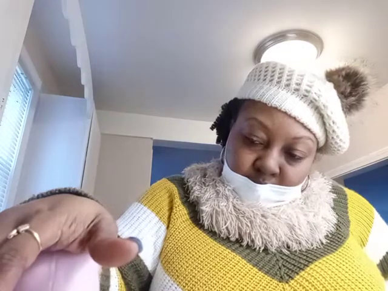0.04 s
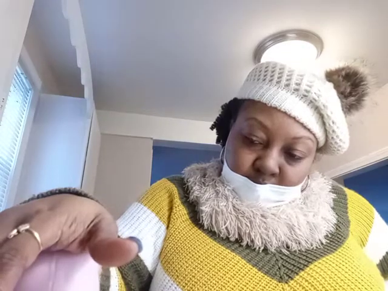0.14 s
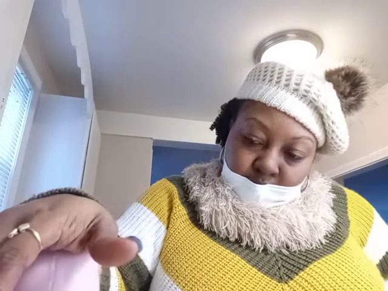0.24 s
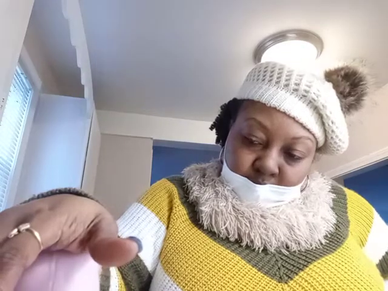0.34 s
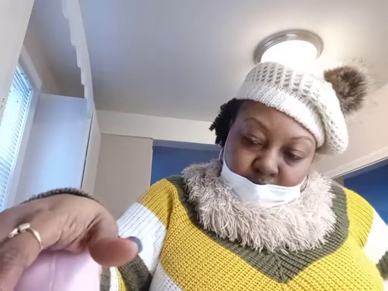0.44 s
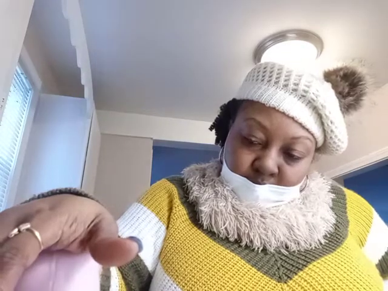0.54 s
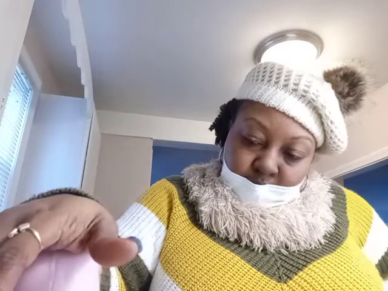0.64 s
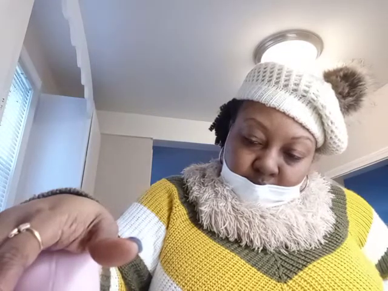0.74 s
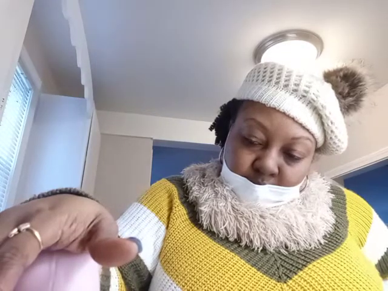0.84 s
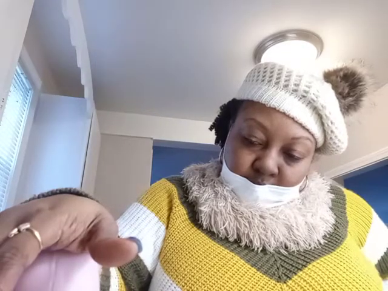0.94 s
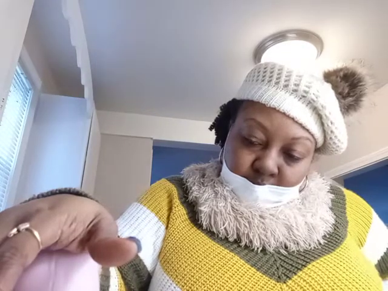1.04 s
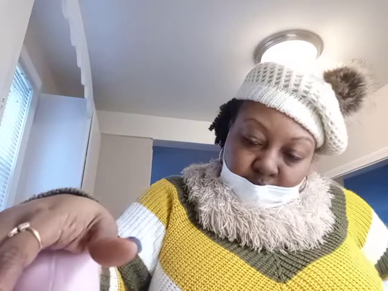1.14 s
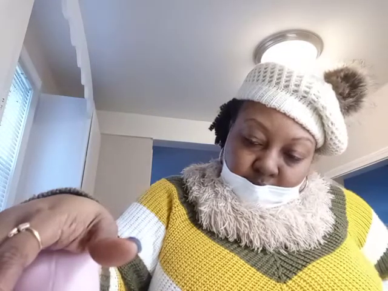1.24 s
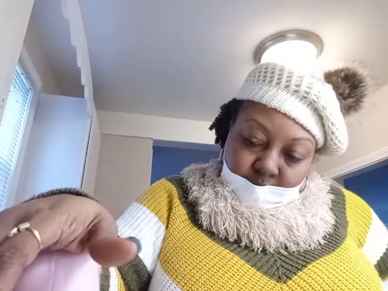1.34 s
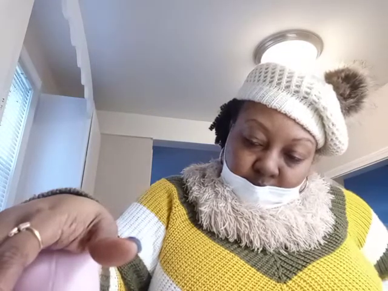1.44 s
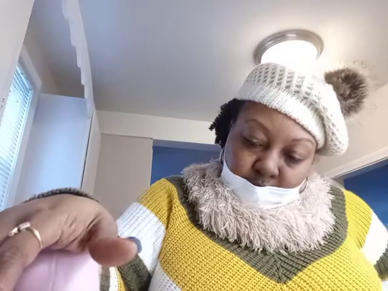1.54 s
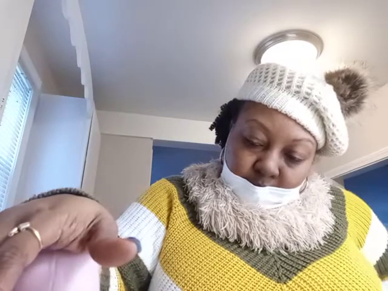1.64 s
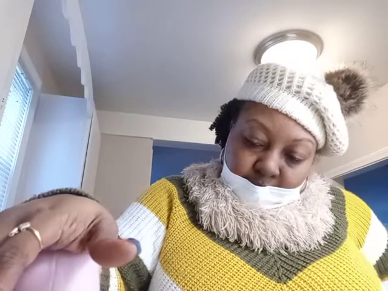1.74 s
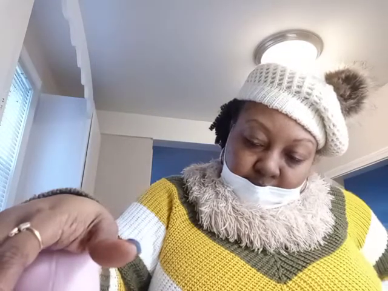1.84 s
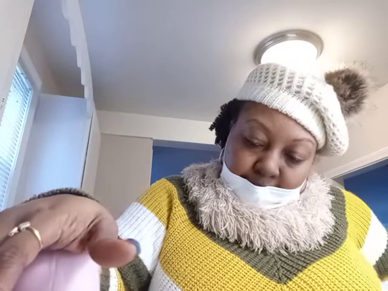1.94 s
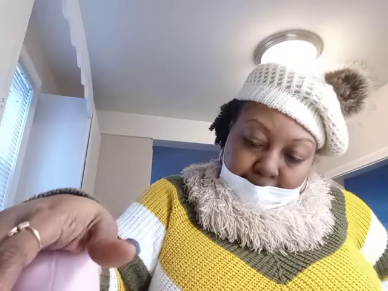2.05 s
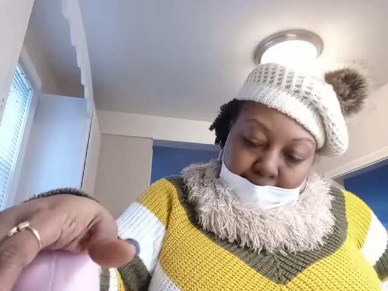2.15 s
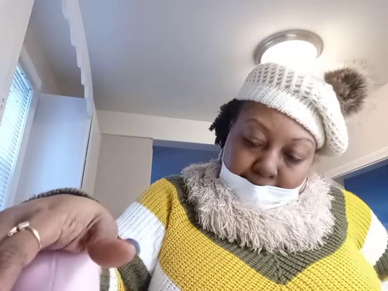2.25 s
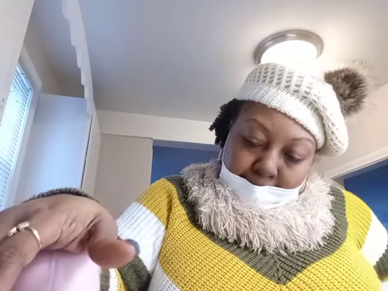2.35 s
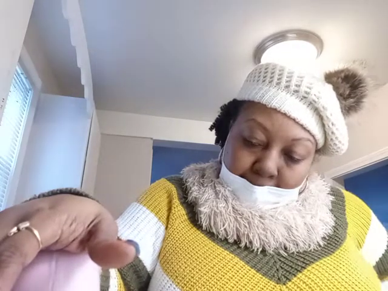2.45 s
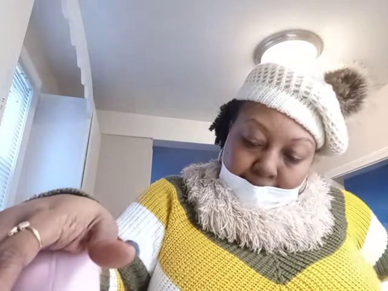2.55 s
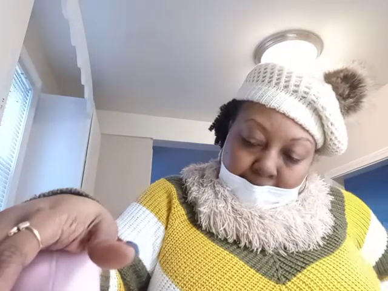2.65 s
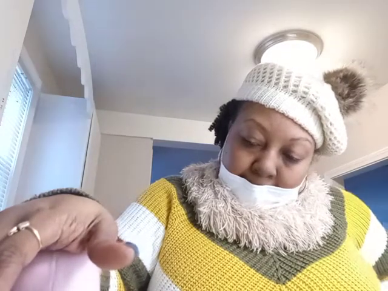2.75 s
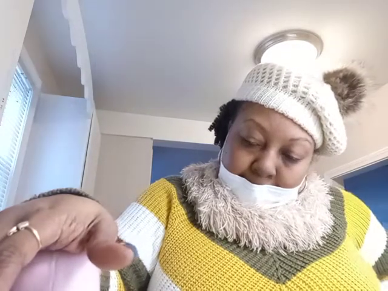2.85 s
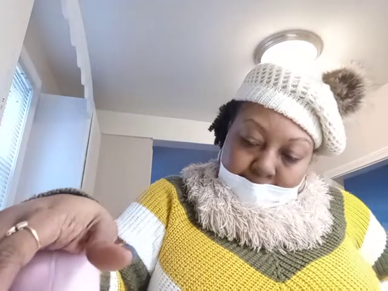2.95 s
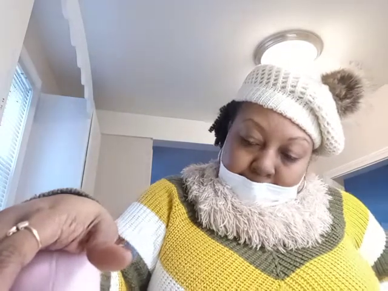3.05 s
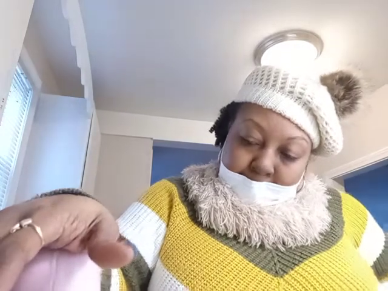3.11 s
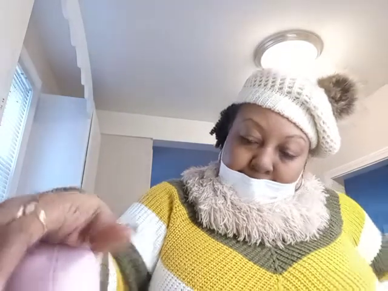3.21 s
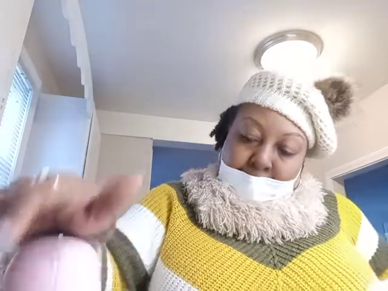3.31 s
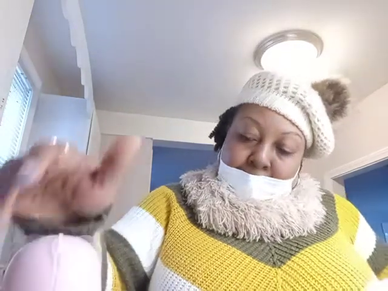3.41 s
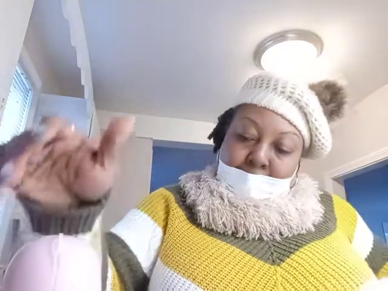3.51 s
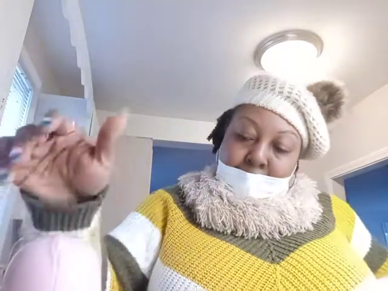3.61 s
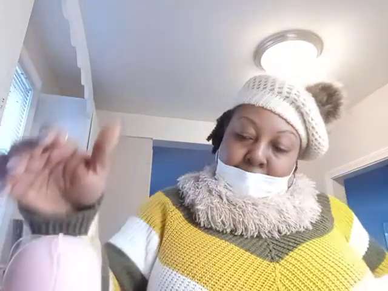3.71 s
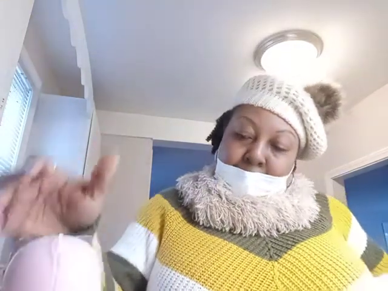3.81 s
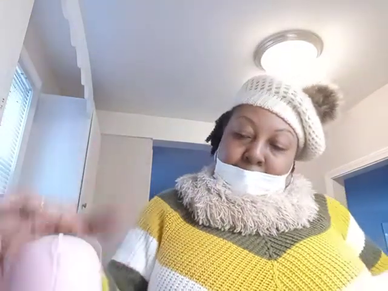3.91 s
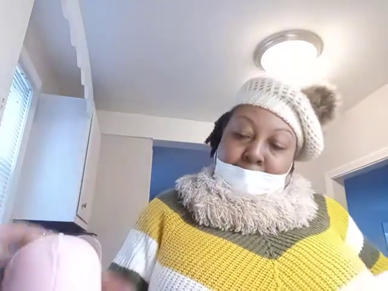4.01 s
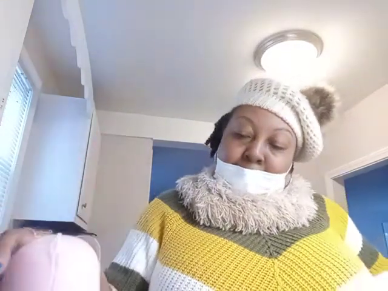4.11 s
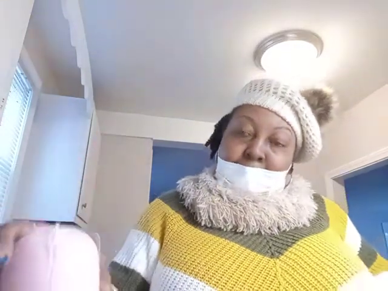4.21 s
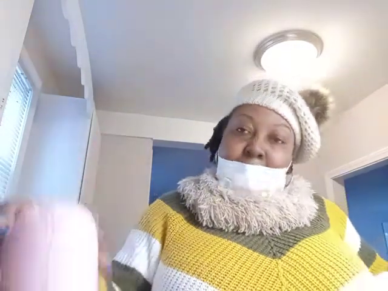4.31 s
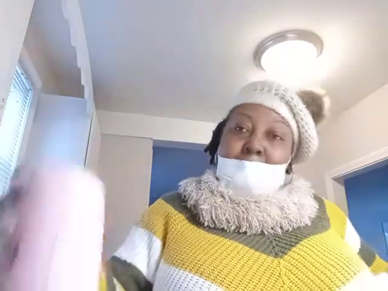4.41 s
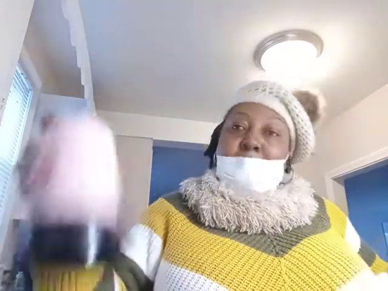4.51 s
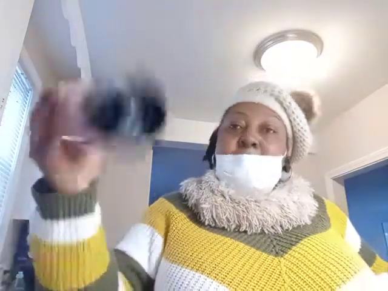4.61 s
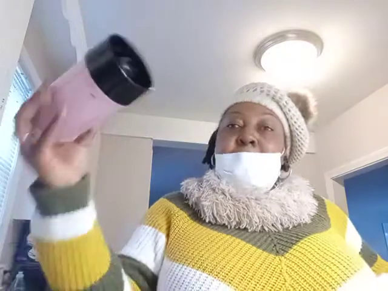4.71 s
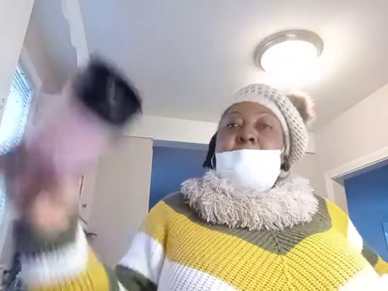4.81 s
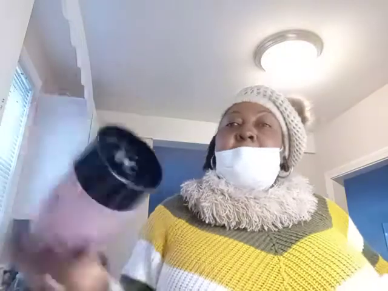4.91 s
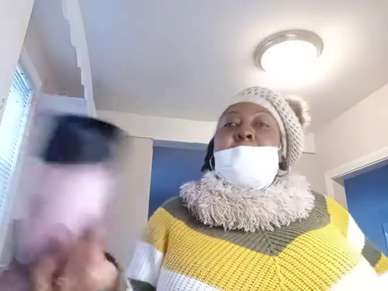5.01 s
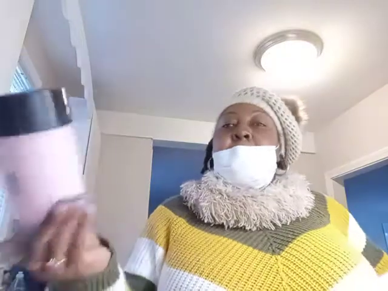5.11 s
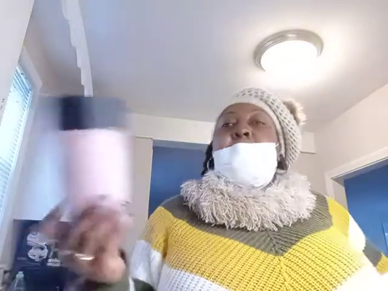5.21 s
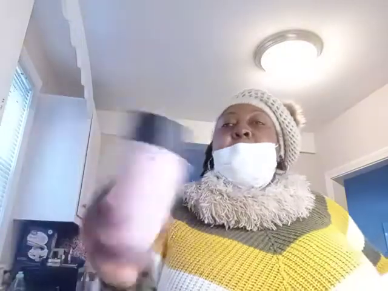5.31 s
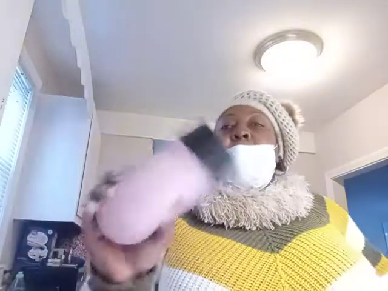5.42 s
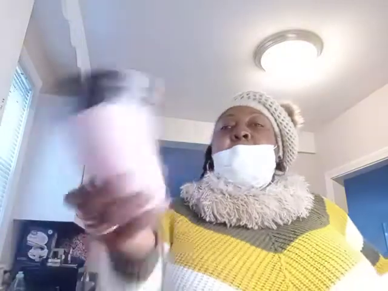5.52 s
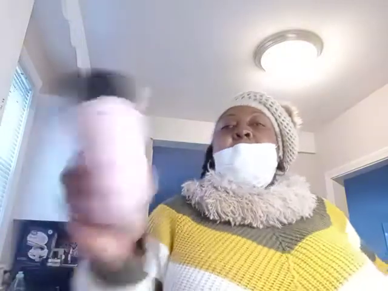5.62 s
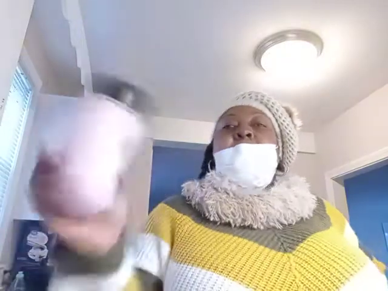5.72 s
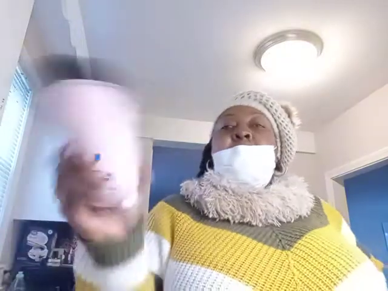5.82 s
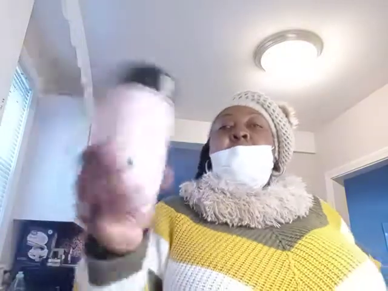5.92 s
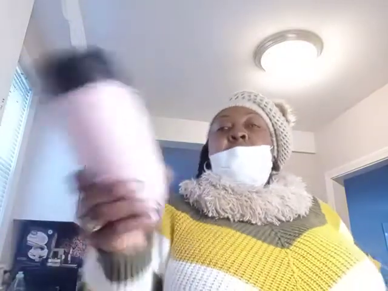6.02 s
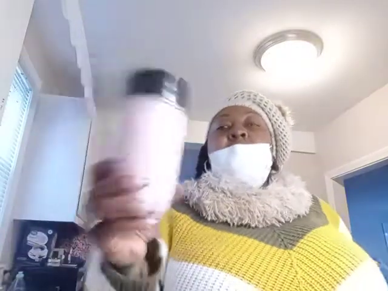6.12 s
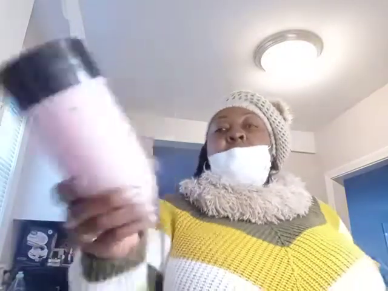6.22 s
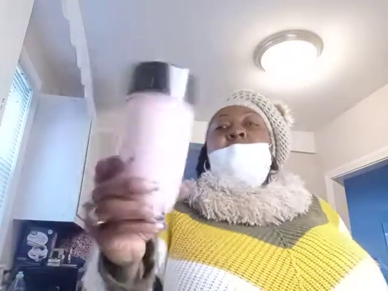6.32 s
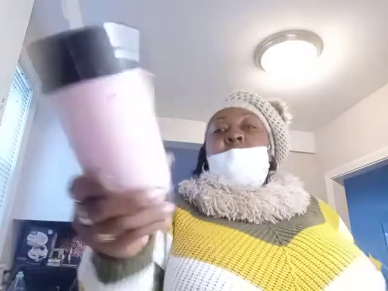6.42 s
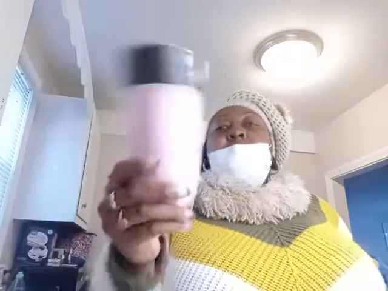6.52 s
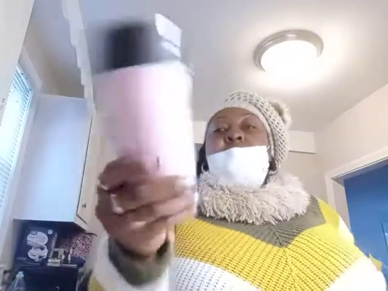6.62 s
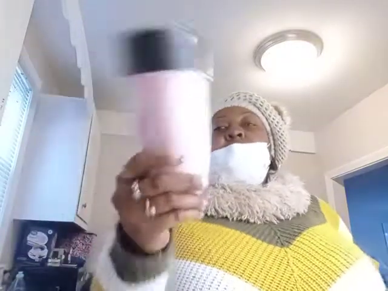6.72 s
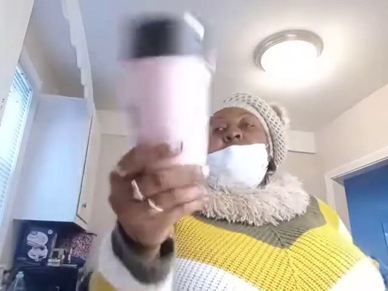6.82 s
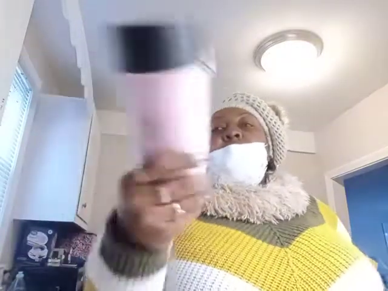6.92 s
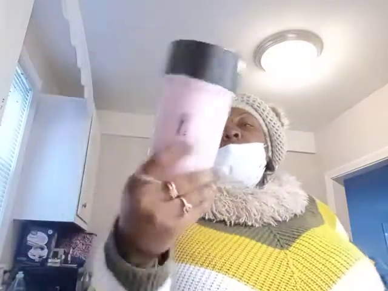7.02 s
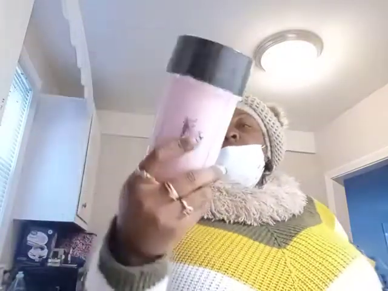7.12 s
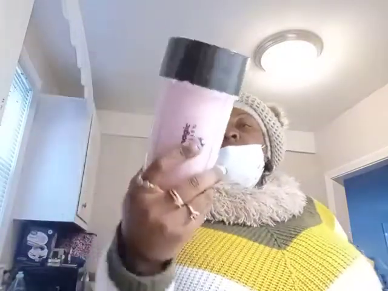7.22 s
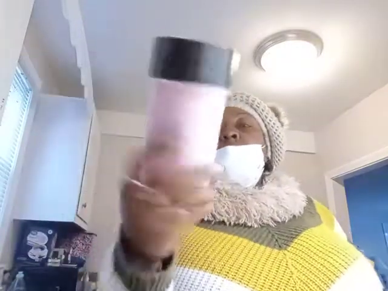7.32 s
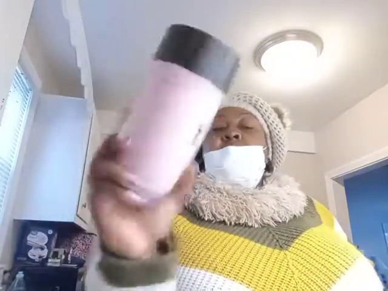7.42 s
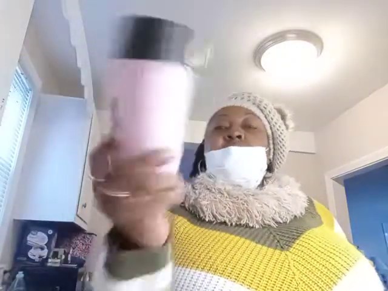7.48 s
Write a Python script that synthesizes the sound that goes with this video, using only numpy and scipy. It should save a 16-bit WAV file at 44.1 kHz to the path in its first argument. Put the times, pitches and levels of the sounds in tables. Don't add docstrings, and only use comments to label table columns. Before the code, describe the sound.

In a small kitchen, with a phone close by on the counter, a compact blender runs loudly and steadily, a harsh buzzing rattle with churning fruit. It cuts off, winds down in a fraction of a second and squeaks faintly. After a brief hush the cup is wrenched off with dull thuds and scrapes, then shaken: ring taps on plastic, thick sloshing and little hollow pops over faint hum and hiss.

```python
import sys
import numpy as np
from scipy import signal
from scipy.fft import rfft, irfft
from scipy.io import wavfile
from scipy.ndimage import uniform_filter1d

SR = 44100
rng = np.random.default_rng(int(sys.argv[2]) if len(sys.argv) > 2 else 0)


def elevation(decibels):
    levels = np.asarray(decibels, float)
    return 10 ** (levels / 20)


def generate_wav(sig):
    pcm = np.round(np.clip(np.atleast_2d(sig).T, -1, 1) * 32767).astype(np.int16)
    wavfile.write(sys.argv[1], SR, pcm)


N = 332955
T = np.arange(N) / SR
HIT_T = np.arange(6000) / SR


def unit(x):
    return x / np.sqrt(np.mean(x ** 2))


def slope(f, points):
    hz, db = np.transpose(points)
    return elevation(np.interp(np.log(f + 1), np.log(hz), db))


def peaks(f, modes):
    return np.sqrt(sum(elevation(db) ** 2 / (1 + (2 * (f - hz) / w) ** 2) ** 2 for hz, w, db in modes))


def edge(f, hz):
    return 1 / (1 + (f / hz) ** 8)


def shape(x, gain, size=8192):
    cep = irfft(np.log(gain(np.fft.rfftfreq(size, 1 / SR)) + 1e-7), size)
    cep[1:size // 2] *= 2
    cep[size // 2 + 1:] = 0
    response = irfft(np.exp(rfft(cep)), size)
    return signal.oaconvolve(x, response)[:len(x)]


def walk(rate_hz):
    k = int(SR / rate_hz)
    held = np.repeat(rng.standard_normal(N // k + 1), k)[:N]
    return unit(uniform_filter1d(uniform_filter1d(held, k), k))


def noise_like(gain, size=8192):
    return unit(shape(rng.standard_normal(N), gain, size))


def add(out, s, sound):
    i = int(s * SR)
    out[i:i + len(sound)] += sound[:N - i]


def ring(t, hz, t60_s):
    return np.sin(2 * np.pi * hz * t) * 1000. ** (-t / t60_s)


def burst():
    return rng.standard_normal(len(HIT_T))


def shaft_turns(running, load, off_s):
    run_hz, stop_hz, slowing_s = 173.96, 62.4, 0.27
    speed_hz = run_hz * (1 - .004 * load + .004 * walk(12))
    coast_hz = stop_hz + (speed_hz - stop_hz) * np.exp(-np.abs(T - off_s) / slowing_s)
    return np.cumsum(np.where(running, speed_hz, coast_hz)) / SR


def blender():
    # (frequency [Hz], level [dB per Hz])
    body = [(24, -63.5), (40, -37), (124, -11.5), (276, -38), (337, -6.5), (529, -10.5), (751, -15),
            (852, -9), (1150, -11.5), (2100, -4.5), (2770, -3.5), (3300, -6.5), (5050, -15.5), (8550, -13),
            (16000, -40)]
    # (frequency [Hz], width [Hz], level [dB])
    body_rings = [(114, 3.2, -9.5), (165, 20, -9.5), (235.3, 39, -14.5), (335, 38, -9.5), (529, 42.4, -1.5),
                  (640.7, 55, -5), (855, 28, -4.5), (1350, 130, -8.5), (1750, 6.9, 1.5), (2060, 210, -4),
                  (2340, 660, -5), (6570, 380, -13), (7030, 220, -4.5), (7170, 150, -15.5), (7600, 140, -8),
                  (8270, 160, -5.5), (9025, 260, -12), (10040, 270, -13), (10600, 520, -18),
                  (13960, 600, -32), (15440, 300, -36)]
    # (frequency [Hz], width [Hz], level [dB])
    wall_rings = [(3014, 110, 0), (3160, 210, -4), (3276, 130, 3.5), (3390, 90, 3.5), (3530, 190, -3),
                  (3690, 94, -4), (3830, 150, 0.5), (3940, 60, -0.5), (4030, 90, -3), (4120, 62, -4),
                  (4200, 60, -5.5), (4260, 90, -13), (4340, 98, -6), (4510, 260, -11.5)]
    # (frequency [Hz], level [dB per Hz])
    coast = [(24, -20), (50, -12), (87, 7.5), (144, -19), (243, -9), (305, -15.5), (630, 1.5), (751, -16.5),
             (873, 0), (1210, -15.5), (2900, -13.5), (3950, -14), (5180, -27.5), (8130, -17.5),
             (11600, -23.5), (16000, -34)]
    # (frequency [Hz], width [Hz], level [dB])
    coast_rings = [(94, 25, -5), (237, 37, -3.5), (503, 30, -6), (870, 40, -3.5), (1300, 41, -12.5),
                   (2350, 86, -11.5), (3705, 140, -6.5), (4200, 180, -11.5), (7000, 440, -18.5),
                   (8120, 410, -18), (10170, 1500, -21)]
    # (shaft multiple [-], rms level [dB])
    orders = [(1, -75), (2, -45), (3, -46.5), (5, -48.5), (10, -48.5), (20, -36.5)]
    # (level [dB], level per unit load [dB])
    run_levels = [
        (-16, 0.32),
        (-24.5, 0.27),
        (-24, 0.75),
        (-36, 1),
        (-19.5, 0.17),
        (-21.5, -0.3),
    ]
    lift_levels_db = [0.5, 1, 1.5, 0.2, 2, -3]
    # (start [dB], coasting fade [dB/s], friction grips at [s], braking fade [dB/s])
    stop_levels = [(-18, 84, 3.58, 162), (-25.5, 70, 3.563, 234), (-23, 41, 3.68, 357),
                   (-34.5, -1, 3.595, 231), (-21, 61, 3.555, 340), (-24, 118, 4.5, 200)]
    # (band power share, once-a-turn gating depth, flicker [dB])
    bands = [(lambda f: edge(f, 4960) - edge(f, 2850), 1.1, .25),
             (lambda f: edge(f, 1500) - edge(f, 250), .6, 1.1),
             (lambda f: 1 - edge(f, 5200), .95, .6),
             (lambda f: edge(f, 270), .3, 1.5),
             (lambda f: edge(f, 2850) - edge(f, 1450), .15, .7),
             (lambda f: edge(f, 3600) - edge(f, 3000), 9, .3)]
    off_s, still_s, lift_s, lift_len_s = 3.418, 3.8, 3.355, .045
    shudder_hz, shudder_peak_s = 5.8, 3.49
    live = 4 * SR

    running = T < off_s
    load = walk(7)
    turns = shaft_turns(running, load, off_s)
    power = np.clip((3.56 - T) / .16, 0, 1)
    lift = np.exp(-((T - lift_s) / lift_len_s) ** 2)
    shudder_db = 1.5 * np.cos(2 * np.pi * shudder_hz * (T - shudder_peak_s))
    blow = elevation(2.6 * rng.standard_normal(int(turns[-1]) + 1))[turns.astype(int)]
    knock = blow * np.exp(-(turns % 1) / 0.22) * (.35 + .65 * power)

    def driven(f):
        return np.hypot(elevation(-2.5) * slope(f, body), peaks(f, body_rings + wall_rings))

    def coasting(f):
        return np.hypot(elevation(-3) * slope(f, coast), peaks(f, coast_rings))

    out = np.zeros(N)
    chance = [(rng.standard_normal(N), walk(21.83)) for _ in range(4)]
    for k, (share, gate, flick_db) in enumerate(bands):
        noise, flicker = chance[k % 4]
        drive = (noise * (1 + gate * knock) * elevation(flick_db * flicker))[:live]
        on = unit(shape(drive, lambda f: driven(f) * np.sqrt(share(f))))
        free = unit(shape(drive, lambda f: coasting(f) * np.sqrt(share(f))))
        on, free = np.resize(on, N), np.roll(np.resize(free, N), 999)
        layer = np.sqrt(power) * on + np.sqrt(1 - power) * free
        db, per_load_db = run_levels[k]
        run_db = db + per_load_db * load + lift_levels_db[k] * lift
        start_db, fade, grip_s, brake = stop_levels[k]
        stop_db = start_db - fade * (np.minimum(T, grip_s) - off_s) - brake * np.maximum(T - grip_s, 0)
        out += layer * elevation(np.where(running, run_db, stop_db + shudder_db))
        if k == 0:
            tone_fade = elevation(np.where(running, 0, stop_db - start_db))
    for order, db in orders:
        tone = np.sqrt(2) * np.sin(2 * np.pi * order * turns)
        out += tone_fade * elevation(db + 2 * walk(30)) * tone
    return out * np.clip((still_s - T) / 0.043, 0, 1)


def cup(x, hz, bright_db, width):
    # (frequency [Hz], level [dB])
    phone = [(200, -11), (1500, 2.5), (3700, 0.5), (4600, 2), (5300, -4), (6200, 1.5), (7300, 5.5),
             (11000, -6), (16000, -16)]
    place, strength = rng.random((2, 5))
    side = [(hz * 1.2 * (5000 / (hz * 0.82)) ** p, 0.66 * width * hz, -3 - 8 * g)
            for p, g in zip(place, strength)]
    hollow_hz = 950 + 750 * place[0]
    hollow_db = -8.5 - 7 * np.log2(hz / 2000)
    hollow_db += 2.0 - 8.1 * edge(hz, 1100)

    def wall(f):
        plateau = elevation(-8.5) * (hz / (f + 1)) ** .5
        rings = np.hypot(plateau, peaks(f, [(hz, width * hz, 0)] + side))
        return rings * edge(f, 4500) * (1 - edge(f, 0.6 * hz))

    def hollow(f):
        broad = 0.095 * edge(f, 3200) * (1 - edge(f, 470))
        return elevation(hollow_db) * np.hypot(broad, peaks(f, [(hollow_hz, 110, 0)]))

    def bright(f):
        return elevation(bright_db - 7) * np.sqrt((1 - edge(f, 4800)) * (0.074 + edge(f, 12000)))

    parts = [shape(x, lambda f: slope(f, phone) * part(f), size=2048) for part in (wall, hollow, bright)]
    return sum(parts) / np.abs(parts[0]).max()


def ticks():
    # (time [s], peak [dB], ring [Hz], bright part [dB], swell [s])
    loose = [(3.4157, -6, 3860, -19, .0005), (3.43, -6, 3300, -14, .0005),
             (3.517, -12.5, 3900, -21, 0.00083), (4.751, -59, 4200, 8, .002), (5.409, -55.5, 4300, 5, .002),
             (5.735, -49.5, 3600, 3, 0.0055), (5.752, -45, 3200, -2, 0.0066), (5.877, -47, 1590, -12, .002),
             (5.932, -54, 4300, -1, 0.0033), (5.963, -40, 4000, -8, .001), (5.981, -46, 3900, -8, .001),
             (6.091, -39, 4570, -6, 0.0017), (6.162, -47, 3980, -2, 0.0038), (7.254, -47, 5060, 0, .003),
             (5.629, -44.5, 2630, 0.5, 0.0012), (6.288, -43.5, 3600, 1, .004),
             (6.407, -38, 2600, -18, .001), (6.446, -51, 3900, 0, .002), (6.61, -50, 3000, -10, .001),
             (6.692, -53, 2200, -12, .003)]
    # (time [s], peak [dB], ring [Hz], bright part [dB], swell [s])
    cracks = [
        (7.1908, -14, 3300, -2, .0003),
        (7.509, -25, 3100, -2, .0003),
        (5.9412, -31, 4200, 0, .0003),
        (4.3955, -29, 3500, -4, .0003),
        (5.1405, -25, 3400, -2, .0003),
        (6.196, -33, 2200, -14, .0006),
        (6.6325, -33, 3000, -12, .0005),
        (4.22, -43, 2700, -8, .001),
    ]
    out = np.zeros(N)
    for s, db, hz, bright_db, swell_s in loose + cracks:
        swell = HIT_T * np.exp(-HIT_T / swell_s)
        add(out, s, elevation(db) * cup(burst() * swell, hz, bright_db, width=0.42))
    return out


def squeak():
    # (start [s], swell [s], fade [s], peak [dB], pitch [Hz])
    chirps = [
        (3.59, .062, .018, -41.5, 1772),
        (3.672, .032, .056, -48, 1780),
    ]
    # (pitch ratio [-], level [dB])
    partials = [(1, 0), (1.31, -18), (2.09, -20)]
    waver, flutter, out = walk(120), elevation(3.5 * walk(110)), np.zeros(N)
    for s, swell, fade, db, hz in chirps:
        end_s = s + swell + fade
        on_db = np.interp(T, [s - .01, s + 0.01, s + swell, end_s, end_s + .02], [-70, -5, -1, -8, -70])
        phase = 2 * np.pi * np.cumsum(hz * (1 + 0.008 * waver)) / SR
        out += elevation(on_db + db) * sum(elevation(d) * np.sin(ratio * phase) for ratio, d in partials)
    return out * flutter


def motion_db():
    # (time [s], slosh level [dB])
    motion = [(3.76, -84), (4.08, -83), (4.19, -69.5), (4.5, -72), (4.84, -72), (5.03, -58), (5.26, -71.5),
              (5.61, -67.5), (5.82, -57.5), (6.1, -63), (6.21, -69), (6.36, -56.5), (6.55, -67),
              (6.93, -71.5), (7.04, -72.5), (7.22, -65), (7.4, -64), (7.55, -59)]
    s, db = np.transpose(motion)
    return np.interp(T, s, db)


def slosh():
    # (frequency [Hz], level [dB per Hz])
    outline = [(120, -43), (200, -8), (690, -6.5), (795, -4), (1290, -14), (1530, -1), (1950, -3),
               (3860, 6.5), (4920, -11), (6000, -6), (7800, -38.5), (13200, -120)]
    # (frequency [Hz], width [Hz], level [dB])
    modes = [(1220, 100, -15), (1550, 150, -14), (2400, 78, 3), (3050, 90, -9), (3720, 150, 9),
             (4200, 200, 4)]
    grains = 1 + 25 * (rng.random(N) < 400 / SR) * rng.random(N) ** 2
    flow = noise_like(lambda f: np.hypot(elevation(-6.0) * slope(f, outline), peaks(f, modes)))
    return flow * uniform_filter1d(grains, size=40) * elevation(motion_db() + 2.3 * walk(30))


def room_air():
    # (frequency [Hz], level [dB per Hz])
    outline = [(120, -30), (200, -2), (266, -15.5), (369, -12), (450, -14), (854, -16), (1010, -16.5),
               (4260, -34), (6000, -50), (7800, -78), (13200, -120)]
    return noise_like(lambda f: slope(f, outline)) * elevation(-74.5)


def thin_hiss():
    # (frequency [Hz], level [dB per Hz])
    outline = [(2650, -61), (4500, -20), (5770, -33), (6350, -7), (7070, -3.5), (11000, -8.5), (12000, -12),
               (16000, -11.5)]
    level_db = -63.5 + 0.28 * (motion_db() + 69) + 1.8 * walk(12)
    return noise_like(lambda f: slope(f, outline)) * elevation(level_db)


def mains_hum():
    # (frequency [Hz], width [Hz], level [dB])
    modes = [(57.5, 14, -3.5), (115.7, 31, -1.5), (168, 64, -18), (258, 170, -32)]
    # (start [s], end [s], level [dB])
    swells = [
        (3.6, 3.734, -37.5),
        (3.979, 4.5, -52),
        (4.808, 5.523, -53.5),
        (5.628, 6.193, -52.5),
        (6.243, 6.5, -56),
        (6.59, 6.927, -55),
        (7.03, 7.477, -57),
    ]
    lull_db, edge_s, dip_s, dip_len_s = -62, 0.052, 3.92, 0.08
    level = elevation(lull_db) + sum(elevation(db) * np.clip(np.minimum(T - a, b - T) / edge_s, 0, 1)
                               for a, b, db in swells)
    bands = noise_like(lambda f: peaks(f, modes), size=32768) * level * elevation(-6.5)
    dip_db = -14 * np.exp(-((T - dip_s) / dip_len_s) ** 2)
    tone = np.sqrt(2) * np.sin(2 * np.pi * 77.0 * T) * elevation(-66.5 + 2 * walk(12.0) + dip_db)
    return bands + tone


def background():
    bed = slosh() + room_air() + thin_hiss() + mains_hum()
    return bed * np.clip((T - 3.6) / 0.13, 0, 1)


def thuds():
    # (time [s], peak [dB], pitch [Hz], t60 [s])
    events = [
        (4.126, -51, 106, 0.073),
        (4.181, -46, 99.6, 0.061),
        (4.21, -37.5, 102, 0.053),
        (4.272, -31, 103, 0.068),
        (4.288, -30, 92.5, 0.061),
        (4.391, -30, 131, 0.051),
        (4.418, -38, 112, 0.086),
        (4.437, -35, 91.5, 0.066),
    ]
    out, push = np.zeros(N), 1 - np.exp(-HIT_T / 0.008)
    for s, db, hz, t60 in events:
        body = ring(HIT_T, hz, t60) + 1.4 * ring(HIT_T, 2.03 * hz, 0.56 * t60)
        body += .5 * ring(HIT_T, 96, 2.8 * t60)
        add(out, s, elevation(db + 3.5) * push * body)
    return out


def scrapes_and_splashes():
    # (time [s], peak [dB], ring [Hz], bright part [dB])
    scrapes = [(4.131, -48.5, 3900, -5), (4.16, -50, 3130, -2), (4.184, -50, 3710, -9),
               (4.215, -51, 1830, -18), (4.265, -35, 4070, -16), (4.272, -39, 1750, -13),
               (4.406, -34, 2420, -2), (4.424, -33, 4430, -7), (5.198, -45, 2440, -7),
               (5.4, -57.5, 3760, 7), (7.251, -46, 3990, 1), (7.269, -58, 2350, 1), (7.335, -50, 2340, -7),
               (7.386, -42, 1780, -11), (7.452, -57, 1230, -26), (7.478, -51, 1300, -22),
               (7.525, -44, 1270, -22)]
    # (time [s], peak [dB], ring [Hz], bright part [dB])
    splashes = [(5.63, -47.5, 2700, 0), (5.648, -42.5, 3310, -6), (5.684, -45, 4670, -5),
                (5.771, -39, 2030, -24), (5.823, -53, 4340, 6), (5.869, -51, 3660, -7),
                (5.96, -39, 4100, -17), (5.976, -41, 2530, -23), (6.031, -58.5, 3940, 13),
                (6.048, -59, 3890, 7), (6.086, -41.5, 1550, -6), (6.137, -45.5, 3530, -8),
                (6.168, -41.5, 1500, -13), (6.184, -33, 1640, -29), (6.27, -46, 3850, -1),
                (6.301, -35, 1450, -19), (6.333, -40, 2340, -27), (6.393, -40, 2490, -19),
                (6.439, -54.5, 3900, -8), (6.499, -40.5, 3690, -4), (6.513, -35, 3700, -13),
                (6.615, -41, 2280, -12), (6.654, -54, 2910, -13), (6.745, -41.5, 1150, -12),
                (6.769, -62, 1200, -14), (6.839, -47, 3580, -8), (6.855, -39, 1090, -36)]
    swell_s = 0.0067
    out, swell = np.zeros(N), HIT_T / swell_s * np.exp(-HIT_T / swell_s)
    for s, db, hz, bright_db in scrapes + splashes:
        grains = np.repeat(elevation(2.8 * rng.standard_normal(len(HIT_T) // 60)), 60)
        add(out, s, elevation(db) * cup(burst() * swell * grains, hz, bright_db, width=0.13))
    return out


def shell():
    # (time [s], peak [dB])
    hits = [
        (4.218, -53),
        (4.275, -48),
        (4.397, -41),
        (4.441, -44),
    ]
    # (frequency [Hz], level [dB], t60 [s])
    modes = [(1750, 3.5, 0.051), (2460, -8, 0.15)]
    out = np.zeros(N)
    for s, db in hits:
        tones = sum(elevation(d) * ring(HIT_T, hz * (1 + 0.011 * rng.standard_normal()), t60) for hz, d, t60 in modes)
        add(out, s, elevation(db) * tones)
    return out


def knocks():
    # (time [s], peak [dB], pitch [Hz], t60 [s])
    events = [(4.275, -31, 560, 0.047), (4.287, -27, 510, 0.035), (4.281, -38.5, 306, 0.06),
              (4.304, -48, 525, 0.077), (4.406, -40, 267, 0.05), (4.43, -33.5, 884, 0.041),
              (4.376, -34.5, 523, 0.084), (4.396, -26.5, 406, 0.033), (4.414, -32.5, 601, 0.063),
              (5.177, -41, 670, 0.052), (5.799, -54, 670, 0.1), (5.839, -52, 745, 0.07),
              (6.099, -53, 357, 0.13), (6.178, -38.5, 460, 0.082), (5.77, -45, 960, .07),
              (5.97, -50, 620, 0.063), (6.309, -47, 484, 0.066), (6.399, -46, 343, 0.075),
              (6.745, -49, 1100, 0.063), (6.62, -49, 870, 0.12), (6.654, -48, 328, 0.083),
              (6.861, -49, 695, 0.11)]
    out, push = np.zeros(N), 1 - np.exp(-HIT_T / 0.003)
    for s, db, hz, t60 in events:
        slump = shape(burst(), lambda f: peaks(f, [(0.79 * hz, 450, 14)])) * 1000. ** (-HIT_T / (2.0 * t60))
        add(out, s, elevation(db) * push * (ring(HIT_T, hz, t60) + 0.59 * slump))
    return out


def taps():
    # (time [s], peak [dB], ring [Hz], bright part [dB])
    events = [(4.376, -40.5, 915, -5), (4.396, -32.5, 2400, -0.5), (4.445, -31.5, 4200, -10),
              (4.867, -41.5, 1510, 1), (4.872, -33, 2810, -11.5), (4.928, -37.5, 3160, 11),
              (4.929, -35, 3920, -9), (5.146, -25, 1180, -9), (5.14, -27.5, 1270, 0.5),
              (5.176, -33, 1980, -17), (5.45, -36.5, 4120, -19), (5.489, -47, 2720, -8),
              (5.665, -36, 2440, -30), (5.764, -34.5, 2600, 0), (5.943, -42, 3750, 6),
              (6.079, -37, 3230, -3), (6.196, -34, 1780, -28), (6.295, -27.5, 1565, -19),
              (6.408, -32.5, 2460, -17), (6.606, -36.5, 1620, -21), (6.632, -32, 1780, -17),
              (6.737, -38, 1070, -12), (6.888, -41, 3260, -12), (6.947, -40, 3830, -15),
              (6.965, -42.5, 2970, -3), (7.192, -24, 3670, -4.5), (7.191, -30, 2150, -8.5),
              (7.509, -35.5, 3080, -3)]
    t60_s = 0.095
    out, fall = np.zeros(N), 1000. ** (-HIT_T / t60_s) + 1.3 * np.exp(-HIT_T / 0.001)
    for s, db, hz, bright_db in events:
        add(out, s, elevation(db) * cup(burst() * fall, hz, bright_db, width=0.16))
    return out


def tink():
    # (frequency [Hz], level [dB], t60 [s])
    modes = [(4150, -7, .025), (11140, 0, 0.037), (14500, -8, .03)]
    out = np.zeros(N)
    tones = sum(elevation(d) * ring(HIT_T, hz, t60) for hz, d, t60 in modes)
    add(out, 4.7505, elevation(-37) * (1 - np.exp(-HIT_T / 0.0014)) * tones)
    return out


def pops():
    # (time [s], peak [dB], pitch [Hz], t60 [s])
    events = [(5.772, -41, 1490, .04), (5.785, -55, 1050, .08), (5.985, -50, 1520, .04),
              (6.03, -67, 1000, 0.07), (6.24, -57, 1300, .08), (6.502, -47, 1600, .025),
              (6.513, -43, 1590, .025), (6.527, -44, 1600, .025), (6.632, -46, 906, .05),
              (6.739, -43, 1040, .05), (6.765, -55, 1130, 0.11), (6.62, -46, 2300, .03),
              (4.872, -46, 1510, .05), (5.01, -55, 2440, .15), (7.3, -60, 2400, .15),
              (6.865, -50, 1020, .08), (7.194, -43, 1550, 0.053), (7.491, -55, 1060, 0.099)]
    out, push = np.zeros(N), 1 - np.exp(-HIT_T / 0.00074)
    for s, db, hz, t60 in events:
        add(out, s, elevation(db) * push * ring(HIT_T, hz, t60))
    return out


def kitchen(x, t60_s=0.26, wet_db=-14):
    t = np.arange(SR // 2) / SR
    tail = rng.standard_normal(len(t)) * 1000. ** (-t / t60_s) * (t > .003)
    return x + elevation(wet_db) * signal.fftconvolve(x, tail / np.sqrt(np.sum(tail ** 2)))[:N]


def scene():
    handling = ticks() + thuds() + scrapes_and_splashes() + shell() + knocks() + taps() + tink() + pops()
    return (blender() + squeak() + background() + kitchen(handling))[None]


def top_cut(x):
    return signal.sosfilt(signal.butter(12, 16470, fs=SR, output="sos"), x)


def record(dry):
    rumble_cut_hz, top_hz, ceiling = 59, 15900, .85
    dry = signal.sosfilt(signal.butter(2, rumble_cut_hz, "high", fs=SR, output="sos"), dry)
    soft = ceiling * np.tanh(dry / ceiling)
    mix = signal.sosfilt(signal.ellip(8, .2, 60, top_hz, fs=SR, output="sos"), soft)
    return top_cut(mix)


dry = scene()
out = record(dry)
generate_wav(out)
```